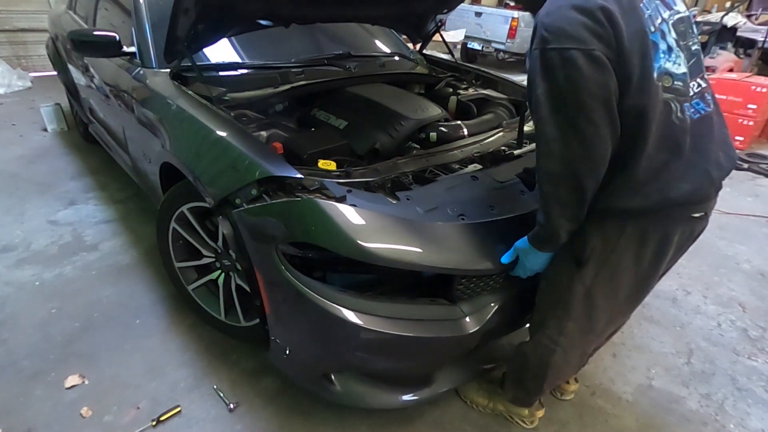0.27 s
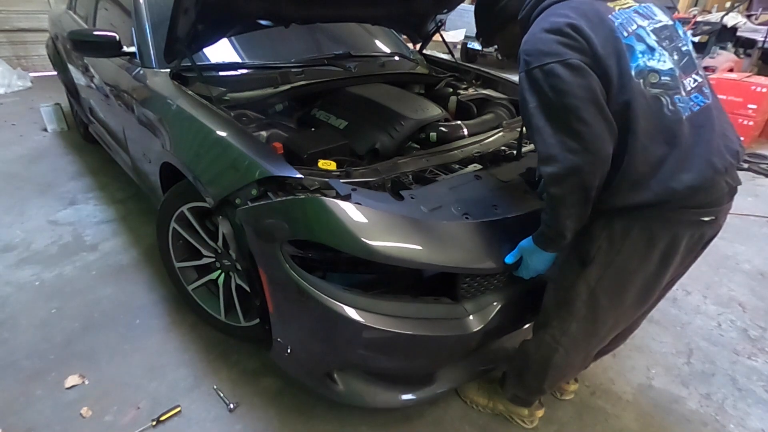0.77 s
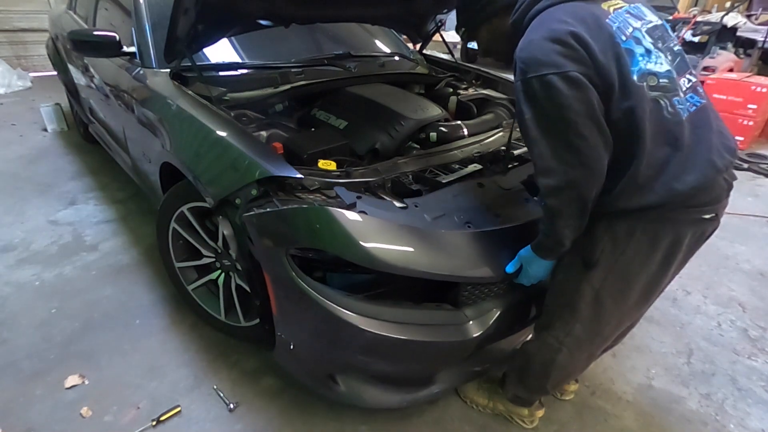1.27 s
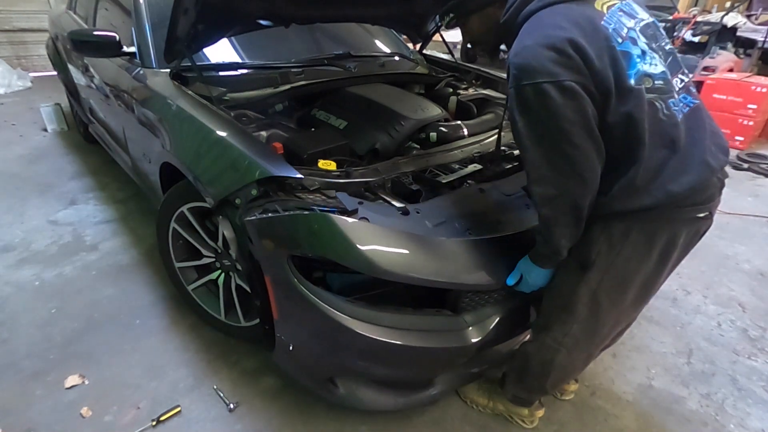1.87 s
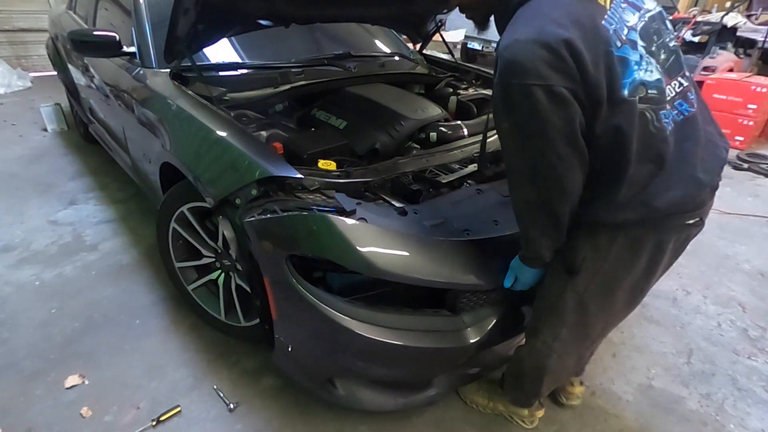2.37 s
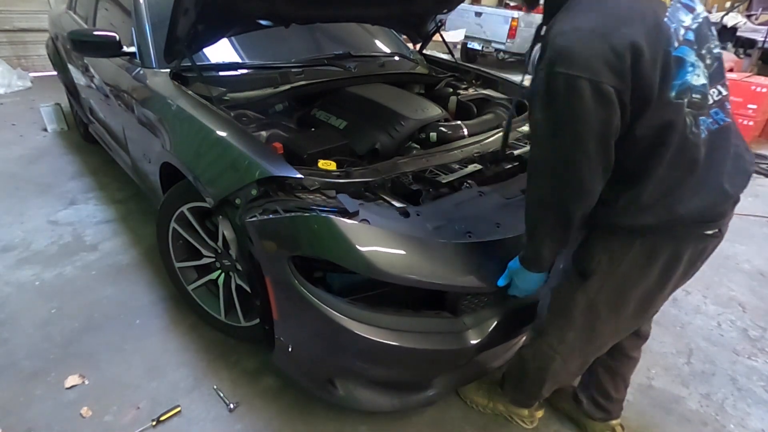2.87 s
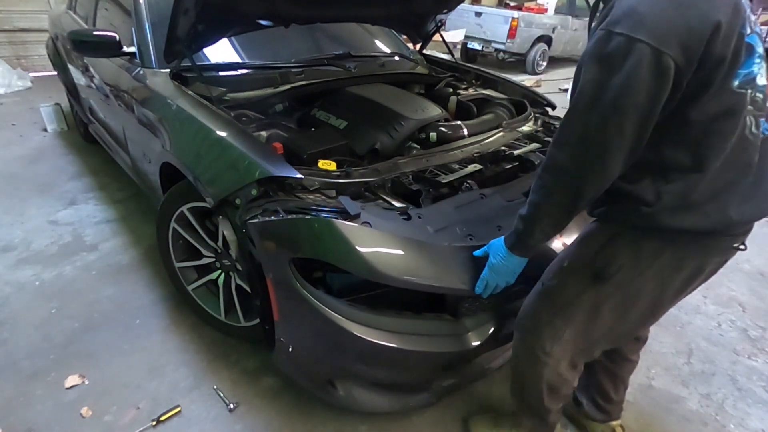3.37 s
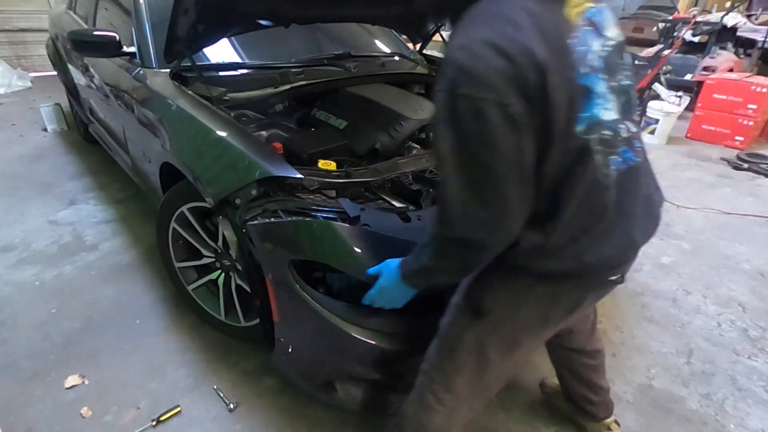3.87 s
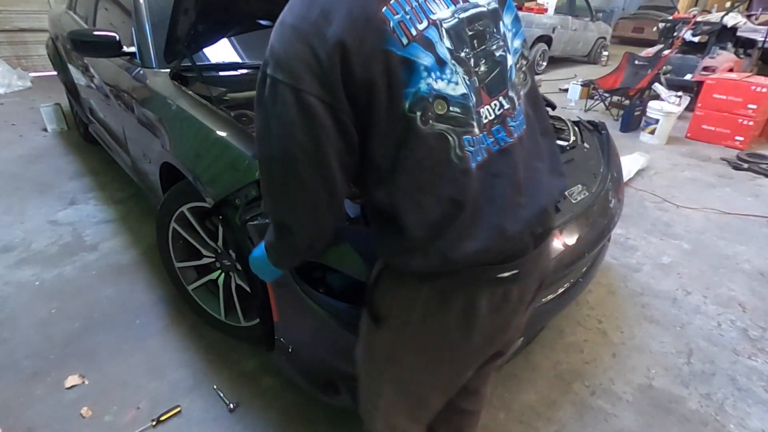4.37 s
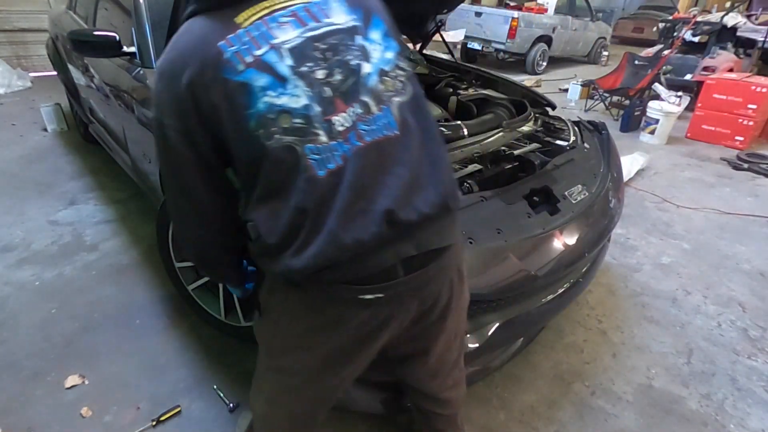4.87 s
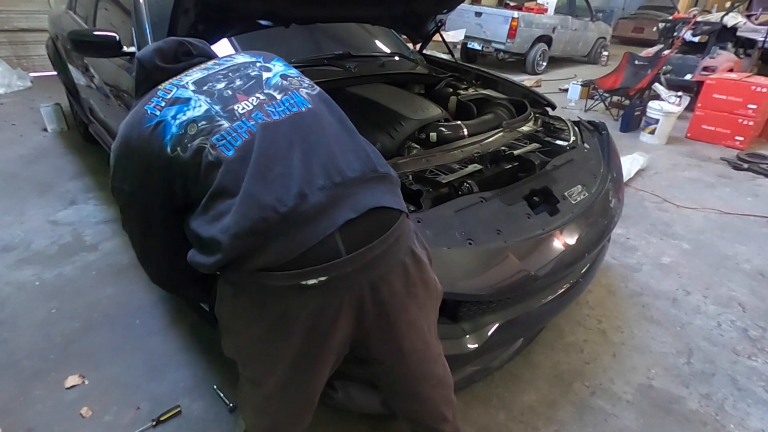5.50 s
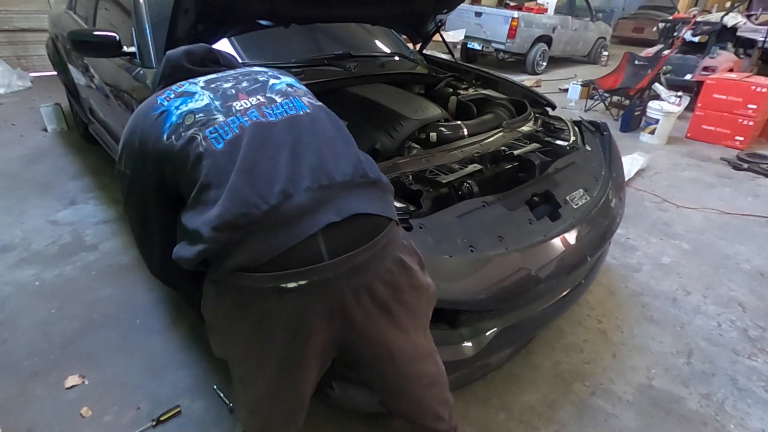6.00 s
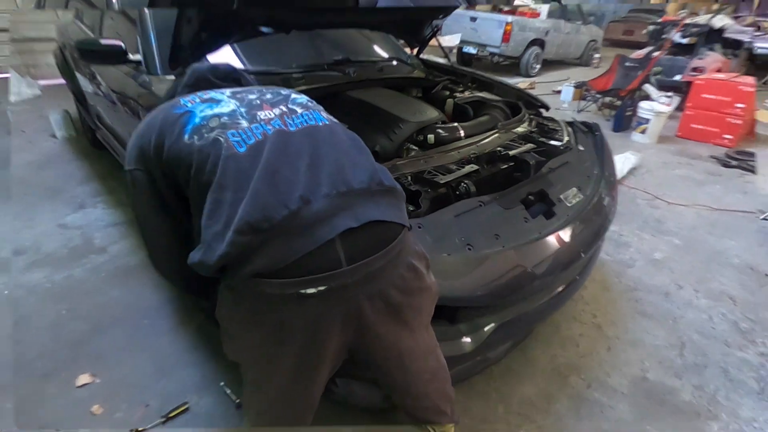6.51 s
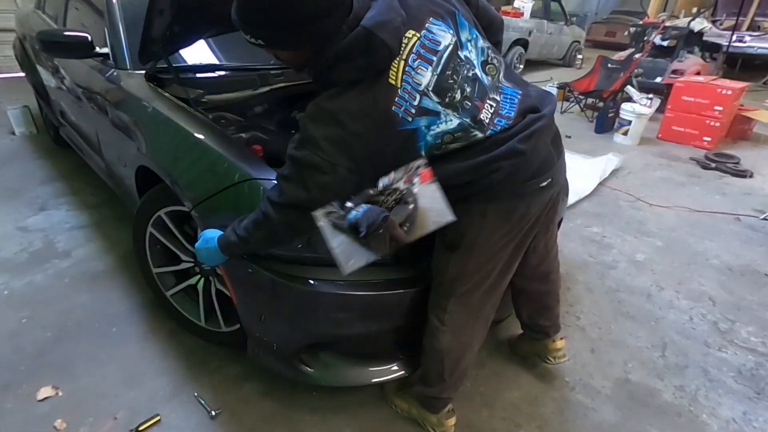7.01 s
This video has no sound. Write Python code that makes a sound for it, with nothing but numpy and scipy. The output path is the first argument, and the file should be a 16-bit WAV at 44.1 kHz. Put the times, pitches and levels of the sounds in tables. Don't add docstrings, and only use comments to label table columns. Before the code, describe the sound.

A distant heater gives a low, uneven rumble under thin hiss in a reverberant concrete garage, heard by a small stereo camera microphone. A short boot scuff and glove rub at 0.1-0.3 s, a light plastic knock at 0.7, a firmer hollow one at 1.2, then soft nudges at 1.4-1.5 and 1.9. A hard microphone pop bursts at 2.2; a soft rattle and long glove scuff follow at 2.4-2.7, with a stronger pop at 2.9. Faint rubber whines at 3.2 and a shove at 3.4 precede a loud hollow crash at 3.63 with rebounds and clip ticks. Scuffs and a small knock at 4.4; gloves squeak and rub at 5.0-5.3, with pops from faint to violent between 5.2 and 5.6. A heavy, boomy slam at 5.94 rebounds quickly, toward the left. Soft rubbing at 6.3-6.6, tiny clip ticks at 6.8-6.9, scuffs, then a moderate closing blow at 7.2.

```python
import sys
import numpy as np
from scipy import signal
from scipy.fft import rfft, irfft
from scipy.io import wavfile

SR = 44100
rng = np.random.default_rng(int(sys.argv[2]) if len(sys.argv) > 2 else 0)


def ratio_of_db(decibels):
    return 10 ** (np.asarray(decibels, float) / 20)


def to_wav(sig):
    pcm = np.clip(np.atleast_2d(sig), -1, 1) * 32767
    pcm = np.round(pcm).astype(np.int16)
    wavfile.write(sys.argv[1], SR, pcm.T)


N = 319725
SLOW = 40

# frequency in Hz, density in dB per Hz.
AIR = [(500, -25), (800, -9), (1000, -6.5), (1400, -2.5), (2500, -11.5), (5000, -21.5), (7500, -17),
       (9000, -24), (10500, -35.5), (14000, -58)]
# frequency in Hz, density in dB per Hz.
SOLE = [(200, -27.5), (280, 2.5), (450, -7), (750, -6), (950, -25), (1600, -60), (4000, -86.5)]
# time in s, crack in dB, kick in dB, thump in dB, early copy in dB.
POPS = [
    (2.18938, -.3, 1.3, 0., -7.),
    (2.86742, 1.3, 2, .5, -7.),
    (5.2135, -38., -35., -21., -30.),
    (5.28453, -12.5, -10., -4.5, -18.),
    (5.384, -28., -24., -15.5, -25.),
    (5.62533, 1.3, 2, .5, -7.),
]


def unit(x):
    return x / np.sqrt(np.mean(x ** 2) + 1e-20)


def in_time(rows):
    s, *columns = np.transpose(rows)
    return [np.interp(np.arange(N) / SR, s, c) for c in columns]


def at_hz(points, hz):
    frequency, value = np.array(points).T[:2]
    return np.interp(np.log(np.maximum(hz, 1)), np.log(frequency), value)


def colour(x, spectrum):
    cepstrum = irfft(np.log(ratio_of_db(at_hz(spectrum, np.fft.rfftfreq(8192, 1 / SR)))))
    cepstrum[1:4096] *= 2
    cepstrum[4097:] = 0
    taps = irfft(np.exp(rfft(cepstrum)))
    return signal.oaconvolve(x, taps / np.sqrt(np.sum(taps ** 2)))[:len(x)]


def drift(rate):
    pole = np.exp(-2 * np.pi * rate * SLOW / SR)
    noise = rng.standard_normal(N // SLOW + 2002)
    slow = signal.lfilter([1], [1, -2 * pole, pole * pole], noise)[2000:]
    return np.interp(np.arange(N) / SLOW, np.arange(len(slow)), unit(slow))


def grains(per_s, spread_db):
    sizes = ratio_of_db(spread_db * np.minimum(rng.exponential(1, N), 4)) * rng.choice([-1, 1], N)
    return unit(sizes * (rng.random(N) < per_s / SR))


def narrow(hz, width_hz, length):
    sos = signal.butter(2, width_hz / 2, fs=SR, output="sos")
    noise = rng.standard_normal(length + 999) + 1j * rng.standard_normal(length + 999)
    slow = signal.sosfilt(sos, noise)[999:]
    phase = 2 * np.pi * np.cumsum(np.broadcast_to(hz, length)) / SR
    return unit(np.real(slow * np.exp(1j * phase)))


def stroke(s, rise_s, fall_s):
    edge_db, bend = 20, 1.25
    t = np.arange(0, N + SLOW, SLOW) / SR - s
    return -edge_db * np.maximum(-t / max(rise_s, .003), t / max(fall_s, .003)) ** bend


def pressure(strokes, follows, offsets_db):
    gain = sum(ratio_of_db(row[3] + db + follows * stroke(*row[:3])) for row, db in zip(strokes, offsets_db))
    return np.interp(np.arange(N) / SLOW, np.arange(len(gain)), gain)


def hollows(table):
    patch_db, patches_per_s = 4.5, 23
    return sum(ratio_of_db(db + patch_db * drift(patches_per_s)) * narrow(hz, width_hz, N)
               for hz, width_hz, db in table)


def background():
    # time in s, level in dB.
    heater_curve = [(0.0, -47.5), (0.18, -48.5), (0.36, -50), (0.95, -50), (1.39, -47.5), (1.84, -49.5),
                    (2.35, -51.5), (2.56, -51), (2.99, -54), (3.27, -56), (3.8, -49.5), (5.0, -50),
                    (5.85, -51.5), (6.06, -54), (6.4, -54.5), (6.58, -50), (6.93, -53.5), (7.25, -51)]
    # frequency in Hz, density in dB per Hz.
    heater_spectrum = [(11, -39.5), (18, -2), (91, -1), (220, -8), (259, -17), (321, -16), (343, -36.5),
                       (391, -22), (475, -32.5), (659, -39.5), (752, -39.5), (900, -57), (1170, -89),
                       (1980, -120)]
    air_db = -74
    heater_db, = in_time(heater_curve)
    rumble = colour(rng.standard_normal(N), heater_spectrum) * ratio_of_db(heater_db + 0.5 * drift(6.4))
    hiss = np.array([colour(v, AIR) for v in rng.standard_normal((2, N))])
    return rumble + ratio_of_db(air_db + drift(1.1)) * hiss


def garage(x, gap_s):
    # frequency in Hz, t60 in s.
    decay = [(100, 0.8), (400, 0.36), (1500, 0.42), (4000, 0.76), (9000, 0.23), (15000, 0.12)]
    t, tail = np.arange(SR) / SR, 0
    for low in 70 * 2. ** np.arange(8):
        sos = signal.butter(2, [low, 2 * low], "band", fs=SR, output="sos")
        fall = ratio_of_db(-60 * t / at_hz(decay, low * np.sqrt(2))) * np.clip(t / gap_s, 0, 1)
        tail = tail + signal.sosfilt(sos, rng.standard_normal((2, SR))) * fall
    return signal.oaconvolve(x[None], tail / np.sqrt(SR / 20), axes=1)[:, :N]


def whines():
    # start in s, length in s, level in dB, frequency in Hz.
    patches = [(5.01, .04, -66, 1310), (5.06, .07, -66, 1310), (5.12, .03, -66, 2330),
               (5.17, .04, -67, 2330), (5.185, .03, -69, 2590), (5.22, .1, -64, 1880),
               (5.24, .07, -68, 2330), (5.03, .03, -70, 7480), (5.115, .02, -70, 7400),
               (5.17, .03, -71, 7480), (5.245, .035, -69, 7400), (5.3, .025, -74, 7480),
               (5.18, .09, -77, 8870), (5.22, .05, -72, 3500), (3.195, .045, -59, 1330),
               (3.255, .05, -58, 1420), (3.2, .07, -64, 2270), (3.24, .04, -67, 3030),
               (3.29, .015, -70, 3800), (6.98, .02, -59, 3250), (6.985, .03, -56, 1150),
               (2.44, .06, -59, 1500), (2.5, .06, -58, 1400), (2.47, .08, -60, 2550),
               (2.49, .06, -62, 3100), (2.6, .07, -64, 3400), (6.993, .012, -60, 6300),
               (1.529, .003, -69, 4600), (6.52, .08, -69, 2600), (5.93, .006, -57, 1150),
               (2.63, .04, -58, 1450), (2.373, .006, -69, 3650)]
    lead_s, fade_s = .05, .01
    out, t = np.zeros(N), np.arange(SR // 4) / SR - lead_s
    for s, length_s, db, hz in patches:
        outside_s = np.maximum(np.maximum(-t, t - length_s), 0)
        fade = ratio_of_db(db - 20 * outside_s / fade_s)
        i = round((s - lead_s) * SR)
        out[i:i + len(t)] += (fade * narrow(hz, 90 + .035 * hz, len(t)))[:N - i]
    return out


def slides():
    # hardest moment in s, rise in s, fall in s, level in dB, hollow in Hz.
    rubs = [(0.188, 0.029, .04, -57, 1350), (3.215, 0.043, .12, -82, 1400),
            (3.291, 0.036, 0.028, -70.5, 1450), (4.65, .07, 0.12, -70, 1530), (4.989, .02, 0.09, -72, 1400),
            (5.09, 0.098, 0.55, -63, 1400), (5.15, .02, .02, -80, 1400), (5.165, .02, .02, -80, 2300),
            (5.2, 0.046, 0.033, -61.5, 2330), (5.246, 0.048, 0.052, -60.5, 2150),
            (5.275, 0.023, 0.039, -53.5, 2160), (5.305, 0.037, 0.039, -71, 2210),
            (5.375, .03, 0.043, -84, 2040), (6.298, 0.036, 0.018, -64, 1687),
            (6.445, 0.04, 0.29, -101, 2066), (6.584, 0.3, 0.16, -58, 1830), (6.68, 0.088, 0.13, -87, 1800)]
    hiss_db, low_db = -16, 3.5
    patch_db, patches_per_s = 2.5, 17.5
    hollow_hz, = in_time([(row[0], row[4]) for row in rubs])
    level = pressure(rubs, 1, np.zeros(len(rubs)))
    broad = colour(grains(9000, spread_db=5.0), AIR)
    low = colour(grains(3000, spread_db=-2.5), SOLE)
    grip, slip = (ratio_of_db(patch_db * drift(patches_per_s)) for layer in range(2))
    rub = grip * narrow(hollow_hz, 700., N) + ratio_of_db(3.5) * broad + ratio_of_db(low_db) * low
    hiss = slip * ratio_of_db(hiss_db) * narrow(7450., 400., N)
    return ratio_of_db(-5.5) * level * (rub + hiss)


def scuffs():
    # hardest moment in s, rise in s, fall in s, drag in dB,
    # grit over drag in dB.
    boot = [(5.937, 0.022, 0.014, -53, -14), (0.128, 0.067, 0.22, -62.5, 3),
            (0.171, 0.0098, 0.041, -52.5, -7), (0.201, 0.034, 0.041, -48.5, -17),
            (1.189, 0.082, 0.0053, -68, -10), (2.444, 0.037, 0.18, -55.5, -22),
            (2.78, 0.084, 0.082, -75.5, 8), (4.378, .01, 0.094, -60, 9.5), (4.664, 0.22, 0.097, -64.5, 1),
            (5.4, 0.036, 0.055, -67, 0), (5.45, 0.096, 0.21, -69, -5.5), (5.576, 0.19, 0.043, -67.5, -6.5),
            (5.74, 0.12, 0.29, -62, -8), (5.824, 0.032, 0.014, -61, -28), (6.777, 0.0041, 0.12, -68, 3.5),
            (6.926, 0.17, 0.026, -57.5, -9), (7.044, 0.066, 0.044, -52.5, -27), (7.09, .05, 0.17, -76, 7.5)]
    glove = [(3.07, 0.17, 0.15, -88.5, 12.5), (3.633, 0.008, .012, -36, -19.5),
             (2.52, 0.17, 0.19, -46.5, -16), (2.648, 0.12, 0.08, -59, -3),
             (3.225, 0.036, 0.084, -58, -15.5), (3.29, 0.11, 0.035, -54, -12), (3.88, .012, .04, -63, -19),
             (3.94, 0.18, 0.2, -66, -3.2), (4.02, 0.086, 0.067, -65, -10), (4.442, 0.036, .03, -48.5, -36),
             (4.771, 0.012, 0.045, -53, 9), (4.83, 0.061, 0.23, -63, -0.8),
             (6.999, 0.018, 0.015, -54.5, 12)]
    # frequency in Hz, density in dB per Hz.
    drag_spectrum = [(450, -28.5), (750, -16), (1050, -1), (1400, 4), (1850, -0.5), (2400, -9), (3300, -13),
                     (4500, -15), (7000, -33), (11000, -76.5)]
    grit_spectrum = [(1590, -0.5), (2700, -33), (3150, -11), (3700, -7), (5820, -5), (7850, -9),
                     (9570, -12), (13500, -37), (15500, -53.5)]
    # frequency in Hz, width in Hz, level over the layer in dB.
    drag_hollows = [(1400, 200, -4), (2340, 350, -13), (3016, 890, -14.5)]
    grit_hollows = [(3570, 770, -17.5), (5280, 680, -17), (6400, 1400, -10), (7780, 770, -11)]
    drag = colour(grains(5000, spread_db=-1.5), drag_spectrum) + hollows(drag_hollows)
    grit = colour(grains(11000, spread_db=-6.5), grit_spectrum) + hollows(grit_hollows)
    sole = colour(grains(2000, spread_db=2.), SOLE)
    strokes = boot + glove
    sole_db = [-1] * len(boot) + [-16] * len(glove)
    grit_db = [row[4] for row in strokes]
    layers = pressure(strokes, 1, np.zeros(len(strokes))) * drag
    layers += pressure(strokes, .76, sole_db) * sole
    layers += pressure(strokes, 1, grit_db) * grit
    return ratio_of_db(1.2 * drift(35)) * layers


def rings():
    # time in s, level in dB, frequency in Hz, t60 in s.
    struck = [(1.201, -32, 1558, 0.15), (7.197, -35, 805, 0.12), (1.453, -40, 392, 0.11),
              (2.372, -37.5, 370, 0.08), (2.394, -43, 384, 0.1), (3.411, -38, 747, 0.21),
              (3.634, -26, 1345, 0.24), (3.64, -31.5, 1620, 0.46), (3.659, -30.5, 381, 0.23),
              (5.818, -46.5, 1042, 0.12), (5.942, -29, 326.5, 0.23), (5.99, -31, 760, 0.073),
              (5.96, -33, 110, .35), (1.912, -40, 200, .14), (1.2, -59, 3050, .2), (1.2, -40, 420, .12),
              (7.196, -46, 330, .12), (3.64, -39, 1000, .2), (7.194, -35.5, 496, 0.18),
              (1.494, -47.5, 1610, .12), (1.911, -45, 2344, 0.019), (3.413, -45.5, 1123, .12),
              (6.562, -52, 1785, 0.14)]
    out, t = np.zeros(N), np.arange(SR // 2) / SR
    for s, ring_db, ring_hz, t60 in struck:
        i = round(s * SR)
        fall = ratio_of_db(ring_db - 60 * t / t60) * np.clip(t / 0.0012, 0, 1)
        out[i:i + len(t)] += (fall * narrow(ring_hz, 0.15 * ring_hz, len(t)))[:N - i]
    return out


def body(x, modes):
    t, taps = np.arange(SR // 4) / SR, 0
    for k, (hz, db, t60) in enumerate(modes):
        decay = ratio_of_db(db - 60 * t / min(t60, .1, 35 / hz))
        taps = taps + (-1) ** k * decay * np.sin(2 * np.pi * hz * t)
    return signal.oaconvolve(x, taps / np.sqrt(np.sum(taps ** 2)))[:N]


def knocks():
    # time in s, shell clack in dB, panel boom in dB, clip tick in dB,
    # rattle t60 in s.
    blows = [(0.684, -38, -41.5, -42, 0.1), (1.198, -34, -34.5, -55.5, 0.22),
             (1.491, -43, -43.5, -73, 0.17), (1.908, -43, -37.5, -57, 0.2), (3.632, -14, -29.5, -32, 0.17),
             (3.656, -25, -35, -43.5, 0.38), (4.441, -40, -43, -56.5, 0.16),
             (5.9418, -14.5, -24.5, -36, 0.14), (5.976, -21.5, -26, -44, 0.093),
             (5.998, -29, -31, -52, 0.32), (6.019, -45, -43, -51, 0.16), (6.061, -31, -42, -43, 0.085),
             (7.1955, -31, -40, -51.5, 0.38), (7.231, -37, -44, -53, 0.29)]
    shoves = [
        (1.37, -54, -41, -76, 0.13),
        (1.446, -45, -36, -70, 0.17),
        (2.368, -60, -43, -68.5, 0.7),
        (3.404, -38, -35.5, -61.5, 0.26),
        (6.976, -42, -55.5, -50.5, 0.27),
        (7.171, -40, -56, -52, 0.3),
        (3.619, -27, -34, -52, .1),
    ]
    # time in s, shell clack in dB, clip tick in dB.
    light = [(6.796, -56, -56), (6.862, -70, -62), (6.908, -60, -56), (6.921, -63, -62), (1.387, -46, -67),
             (0.488, -55, -59), (0.927, -55.5, -81), (1.062, -55.5, -62), (1.525, -57, -63),
             (3.08, -78, -70), (3.478, -66, -65), (4.084, -57, -63.5), (5.821, -43, -73), (6.347, -85, -73),
             (6.775, -51, -51), (6.831, -54, -46.5), (7.103, -54, -93)]
    # time in s, shell in dB, panel in dB, clip in dB.
    snaps = [
        (5.9415, -15, -26, -31),
        (5.9765, -30, -36, -42),
        (6.001, -28, -31, -56),
        (6.0195, -38, -40, -42),
        (6.062, -40, -44, -44),
        (3.6335, -26, -38, -40),
        (3.648, -27, -33, -44),
        (3.663, -30, -34, -46),
        (7.197, -33, -33, -52),
        (7.21, -33, -33, -52),
    ]
    # frequency in Hz, level in dB, t60 in s.
    panel = [(79, -6.5, 0.21), (150, 0.5, 0.08), (187, 7.5, 0.025), (256, 3, 0.04), (342, 0, 0.04),
             (422, 0, 0.033), (520, 2, 0.025), (643, 3, 0.018)]
    shell = [(810, -0.5, 0.022), (918, -1.5, 0.033), (1070, 2, 0.019), (1320, 3.5, 0.02), (1550, -1, 0.03),
             (1880, 0, 0.0094), (2140, -3, 0.013), (2450, -8, 0.012), (3050, -9, .007),
             (3760, -10.5, 0.0052)]
    # frequency in Hz, density in dB per Hz.
    tick = [(1500, -32), (2600, -4.5), (3600, -3), (5000, -7), (7500, -8), (10000, -20.5), (13000, -33.5),
            (16000, -46)]
    hard = blows + [(s, db, db - 5, tick_db, .1) for s, db, tick_db in light]
    rises_s = [.0015] * len(hard) + [.007] * len(shoves)
    drive, t = np.zeros((3, N)), np.arange(SR // 2) / SR
    for (s, clack_db, boom_db, tick_db, t60), rise_s in zip(hard + shoves, rises_s):
        i, t60, rise = round(s * SR), max(t60, .004), np.clip(t / rise_s, 0, 1)
        rattle = ratio_of_db(-60 * t / t60) * rise
        rattle *= 1 + 0.6 * ratio_of_db(-60 * t / 0.026)
        crack = ratio_of_db(-60 * t / (0.76 * t60)) * rise
        gains = ratio_of_db([[boom_db], [clack_db], [tick_db]])
        drive[:, i:i + len(t)] += (gains * [rattle, rattle, crack])[:, :N - i]
    contacts = [grains(3000, spread_db=0.5), grains(4600, spread_db=1.5), grains(9000, spread_db=4.5)]
    drive = drive * contacts
    for s, clack_db, boom_db, tick_db in snaps:
        drive[:, round(s * SR)] += ratio_of_db([boom_db + 26, clack_db + 26, tick_db + 16])
    boom = ratio_of_db(1.5) * body(drive[0], panel)
    clack = ratio_of_db(-9.0) * body(drive[1], shell)
    return boom + clack + ratio_of_db(-4.0) * colour(drive[2], tick)


def swell(t, width_s):
    u = np.clip(t, 0, None) / width_s
    return u * np.exp(1 - u)


def zero_phase(x, order, hz, kind):
    return signal.sosfiltfilt(signal.butter(order, hz, kind, fs=SR, output="sos"), x)


def dull(x):
    return zero_phase(x, 1, 2600, "low")


def pops():
    # frequency in Hz, level in dB.
    band_edges = [(1200, -24), (6020, -44), (8050, -47), (9000, -52)]
    # bite in dB, flank in dB.
    sharpness = [(-1, -1.5), (0, 4), (0, 0), (0, 0), (0, 0), (-5, -1)]
    frame_s = 512 / 48000
    edge_db, early_crack_db = -14.5, -7
    bite_level_db, late_db, late_loss_db = -10.5, -39, 12.5
    out, t = np.zeros((2, N)), (np.arange(8192) - 4096) / SR
    step = -3.2 * np.tanh(7350 * t) + 1.1 * np.exp(-(t / .00015) ** 2)
    crack = zero_phase(step, 8, 1200, "high")
    smear = zero_phase(step, 16, 1150, "high")
    bite = zero_phase(-np.sign(t - 1.5 / SR), 3, [4000., 9500.], "band")
    edge = zero_phase(-np.sign(t), 2, [2200., 9500.], "band")
    push = .78 * swell(t - .00024, .00026)
    kick = dull(push - .61 * swell(t, .00014))
    sag = signal.butter(2, [46, 600], "band", fs=SR, output="sos")
    thump = signal.sosfilt(sag, -.81 * np.clip((t - .001) / .001, 0, 1))
    late_thump = signal.lfilter([.02], [1, -.98], np.roll(thump, 75))
    around = ratio_of_db(-20 * np.maximum(-t / 0.019, t / 0.0045))
    ringing = around * sum(ratio_of_db(db) * np.cos(2 * np.pi * hz * t) for hz, db in band_edges)
    for (s, crack_db, kick_db, thump_db, early_db), (bite_db, flank_db) in zip(POPS, sharpness):
        i = round(s * SR) - 4096
        high = ratio_of_db(crack_db) * crack + ratio_of_db(2 * crack_db) * ringing
        high += ratio_of_db(1.5 * crack_db + bite_level_db + bite_db) * bite
        flank = ratio_of_db(1.6 * crack_db + edge_db + flank_db) * edge
        low = ratio_of_db(kick_db) * kick + ratio_of_db(thump_db) * thump
        out[:, i:i + 8192] += [high + flank, low - 1.228 * high + flank]
        for k in (1, 2, 3):
            late = ratio_of_db(crack_db + late_db - late_loss_db * (k - 1)) * smear
            i = round((s + k * frame_s) * SR) - 4096
            out[:, i:i + 8192] += [late, -late]
            high = (-1) ** k * ratio_of_db(crack_db + k * (early_db + early_crack_db))
            high = high * (smear + ratio_of_db(bite_level_db - 6.5) * bite)
            low = ratio_of_db(kick_db + 2 - 5 * k) * dull(push) + ratio_of_db(thump_db + 4) * late_thump
            low = (-ratio_of_db(early_db)) ** k * low
            i = round((s - k * frame_s) * SR) - 4096
            out[:, i:i + 8192] += [high, low - high]
    return out


def ducking(depth_db, hold_s, back_s):
    t, db = np.arange(N) / SR, np.zeros(N)
    for s, crack_db, *rest in POPS:
        shape = np.clip((t - s) / 0.012, 0, 1) * np.clip((s + hold_s + back_s - t) / back_s, 0, 1)
        db -= depth_db * ratio_of_db(2 * crack_db) * shape
    return ratio_of_db(db)


def ports(x, duck):
    side = (x[0] - x[1]) / 2
    high = zero_phase(side, 8, 1150, "high")
    side = high + ratio_of_db(-15) * (side - high)
    return x.mean(axis=0) * duck + side * duck ** .4 * [[1], [-1]]


def scene():
    # time in s, left over right in dB.
    work_pan = [(0, -1), (.5, -1), (1.2, 1.5), (1.6, 0), (2.4, -.5), (2.8, -1), (3.6, 2.4), (5.6, 2.4),
                (5.95, 4.5), (6.3, 2.4), (7.25, 2.4)]
    # frequency in Hz, level in dB.
    inlet = [(500, 0.5), (850, -4), (1100, -2.5), (1450, -4), (2200, 0), (6000, 2.5), (7600, 2.5),
             (10000, -0.5)]
    hits = knocks() + rings()
    rubs = scuffs() + slides() + whines()
    pan_db, = in_time(work_pan)
    direct = (hits + rubs) * ratio_of_db(-1.2 + pan_db * [[.5], [-.5]])
    air = direct + garage(ratio_of_db(-4.0) * hits + ratio_of_db(-5.0) * rubs, gap_s=0.0089)
    air = np.array([colour(v, inlet) for v in air]) + background()
    return ports(air, ducking(depth_db=10.0, hold_s=0.038, back_s=0.22)) + pops()


def band_limit(x):
    return signal.sosfilt(signal.butter(12, 16550, fs=SR, output="sos"), x)


def record(dry):
    top = signal.cheby2(14, 50, 16600, fs=SR, output="sos")
    mix = signal.sosfiltfilt(top, np.clip(dry, -.97, .97))
    return band_limit(mix)


dry = scene()
out = record(dry)
to_wav(out)
```